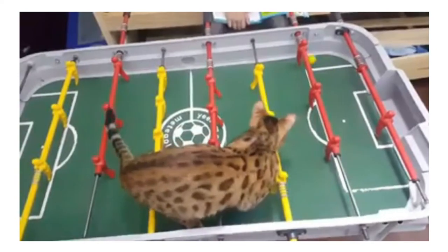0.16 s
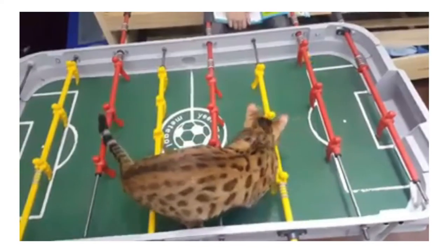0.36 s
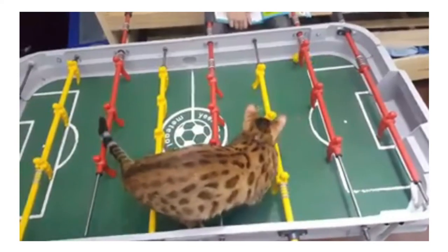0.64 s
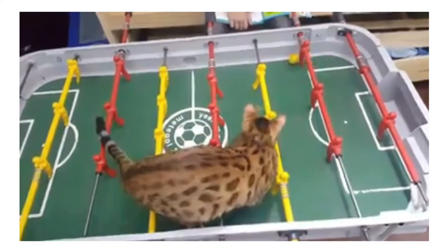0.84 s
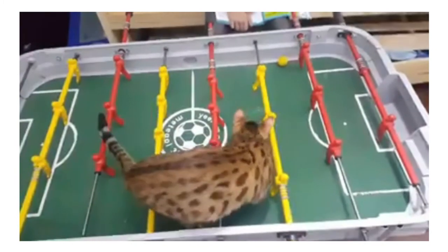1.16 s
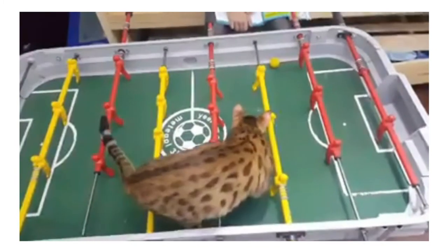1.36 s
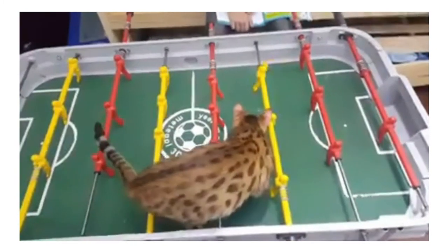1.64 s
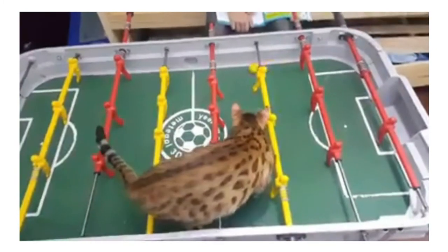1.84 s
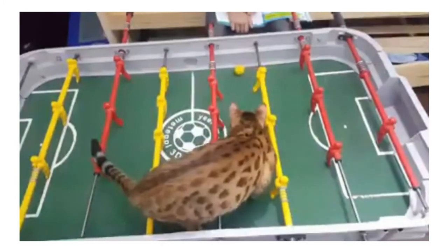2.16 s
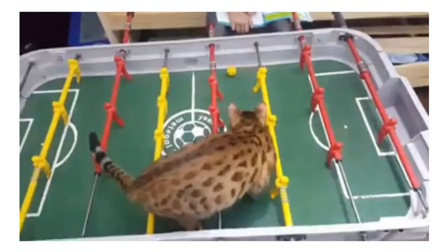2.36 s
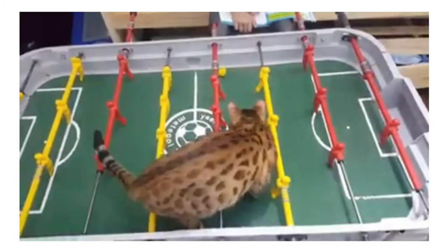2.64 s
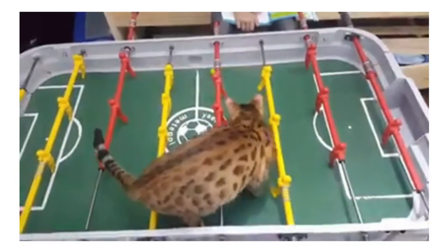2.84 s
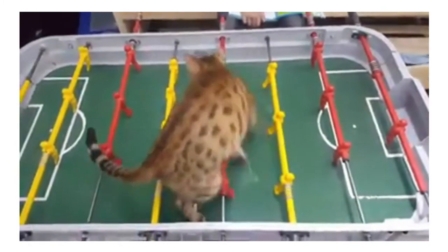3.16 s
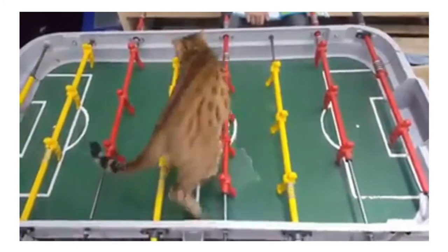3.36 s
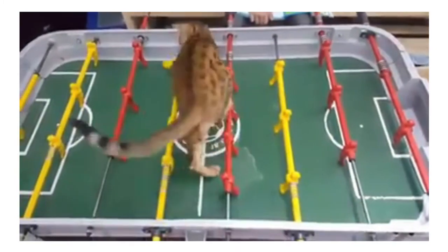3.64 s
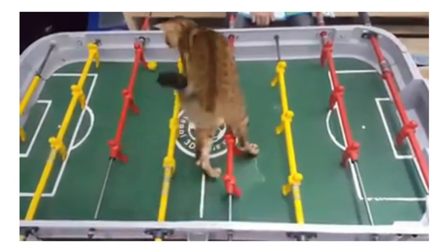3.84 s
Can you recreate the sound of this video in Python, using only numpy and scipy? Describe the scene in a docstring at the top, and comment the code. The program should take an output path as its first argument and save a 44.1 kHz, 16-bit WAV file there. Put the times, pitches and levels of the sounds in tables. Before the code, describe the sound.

Foosball table thumps, clacks and sliding rods in two bursts, with quiet ball rolling between

```python
"""Game table, close indoors

A stereo microphone pair close to a hollow game table: rods slide, rattle and scrape at both ends of the take,
with thumps, hard knocks and clacks; a small ball rolls between them. Pushes and noisy forces drive the
table's resonances, clacks are noise in the modes of the parts, and decaying noise makes the room's answer.
A faint coloured hiss lies behind, and all of it leans slightly to the left."""
import sys
import numpy as np
from scipy import signal
from scipy.fft import rfft, irfft, next_fast_len
from scipy.io import wavfile
from scipy.ndimage import uniform_filter1d, map_coordinates

SR = 44100
rng = np.random.default_rng(int(sys.argv[2]) if len(sys.argv) > 2 else 0)


def generate_wav(sig):
    """Save sig (samples, or channels by samples) to the path in sys.argv[1] as 16-bit PCM at SR."""
    pcm = np.round(np.clip(np.atleast_2d(sig).T, -1, 1) * 32767).astype(np.int16)
    wavfile.write(sys.argv[1], SR, pcm)


N = 176400  # samples: 4 s

# Resonances of the hollow table: (frequency [Hz], level before the scatter from spot to spot [dB])
TABLE_MODES = [(103, -57), (139, -42), (178, -46.5), (214, -42.5), (300, -41), (357, -45), (418, -45),
               (490, -49.5), (522, -49), (666, -44.5), (760, -45.5), (883, -52.5), (990, -51.5),
               (1163, -61)]
# Blows on the table: (time [s], level before the ring and push gains [dB], contact time scale [ms])
BLOWS = [(.322, -16, 0.4), (.378, -9, 0.56), (.351, -20.5, 0.44), (.3835, -20, .6), (.389, -16, 0.6),
         (.3935, -19, .6), (.414, -16.5, 0.58), (.462, -20.5, 0.37), (.5155, -20, .4), (.592, -34, 1),
         (.864, -46, .6), (3.068, -40, 0.5), (3.4175, -24, 1.1), (3.426, -10, 3.1), (3.4915, -13, .85),
         (3.904, -12, 1.1), (3.452, -26, 2.9), (3.5135, -21, .7), (3.5235, -17.5, .7), (3.5315, -18, .9),
         (3.5385, -19, .7), (3.5605, -18, 0.82), (3.5695, -21, .7), (3.5876, -24, .7), (3.7168, -28, .9),
         (3.769, -20, 1), (3.779, -21, 1), (3.7925, -22, 1), (3.812, -23, 1.2), (3.8745, -19, 1.8),
         (3.881, -16, 2.64), (3.9285, -17, .9), (3.942, -22, 0.59)]
# Clacks, short scrapes and the woody cores of knocks: (time [s], relative level [dB],
# bright top over body [dB], t60 [s], centre [Hz], reach around it [octaves], room's answer [dB])
CLACK_EVENTS = [(0.3216, -19, -53, 0.14, 1150, 0.79, 4.5), (0.379, -22.5, -40, 0.14, 1660, 0.51, -3),
                (.38, -13.5, -59, 0.21, 720, 0.17, -12), (.459, -17, -50, .15, 910, 0.32, -15),
                (.59, -36, -60, 0.37, 510, 0.32, -8), (0.4589, -23, -19.5, 0.11, 2230, 0.56, -4),
                (.5142, -21, -30, .02, 2300, .6, -16), (3.067, -25, -33, 0.28, 1510, 0.66, -6.5),
                (3.4237, -45, -37, 0.22, 2500, 0.82, -4), (3.468, -28.5, -18, 0.2, 2740, 0.44, -5.5),
                (3.473, -31, -15, 0.1, 2210, 0.26, -16), (3.488, -33.5, -10, 0.15, 3100, 0.17, 1),
                (3.503, -45, -9, 0.15, 3140, 0.23, 5), (3.528, -25, -38, 0.084, 2040, 0.71, 2),
                (3.547, -41, -33, 0.14, 1800, 0.85, -3), (3.565, -44.5, -36, 0.22, 3430, .3, 5.5),
                (3.599, -41, -36, 0.12, 1690, 0.37, -3), (3.881, -20, -9, 0.25, 2060, 0.59, -3),
                (3.904, -20.5, -34, 0.082, 2130, 0.53, -3), (3.963, -17.5, -20, 0.13, 2400, 0.34, -2.5),
                (3.985, -28, -25.5, 0.2, 2390, 0.81, -5)]
# Resonances of the parts, before detuning: (frequency [Hz], level [dB])
PARTS_MODES = [(790, 7.5), (940, 13.5), (1335, 5), (1560, 8.5), (2050, 2.5), (2200, 5), (2540, -5.5),
               (2840, -10.5), (3400, -21.5), (3725, 1.5), (4270, -36)]
# Bright top of a clack: (frequency [Hz], relative density [dB per Hz])
CLACK_TOP = [(2350, -18.5), (4000, 8), (4480, -13), (6520, 3), (11000, -11.5), (13000, -12.5),
             (15600, -26.5)]
# Two passages of sliding rods: (time [s], dull rumble [dB], bright rumble [dB], scrape [dB], treble [dB])
ROD_PASSAGES = [
    [(0, -29.5, -44.5, -61.5, -74), (.05, -46, -56, -87, -89), (.14, -39.5, -41, -87, -85),
     (.2, -38.5, -53, -69.5, -83), (.31, -42.5, -55.5, -71, -90), (.325, -52, -43.5, -51, -74),
     (.372, -57, -36.5, -59, -81), (.385, -37, -27, -62, -89), (.42, -40, -33.5, -63, -86),
     (.45, -78, -28.5, -48, -86.5), (.47, -32, -37, -49.5, -83), (.525, -55, -76, -69, -73),
     (.55, -60, -74, -77, -78), (.58, -65, -66, -75, -77), (.6, -59, -48.5, -77, -80),
     (.63, -42.5, -47, -72, -76), (.68, -61, -63, -70, -84), (.8, -63, -74, -90, -84)],
    [(3.414, -60, -38, -70, -66), (3.428, -26, -47, -48, -69), (3.46, -39, -31.5, -46, -58.5),
     (3.488, -46, -35, -46, -64), (3.496, -25.5, -20.5, -49, -60), (3.54, -34.5, -37.5, -46, -59.5),
     (3.6, -25.5, -33.5, -55, -65), (3.65, -34, -43.5, -50, -64), (3.7, -33.5, -45, -61, -71),
     (3.77, -29.5, -40, -56.5, -69), (3.83, -38, -38, -53, -70.5), (3.87, -29, -35, -59, -67.5),
     (3.899, -31, -38, -45, -67), (3.907, -36, -21, -50, -65), (3.945, -28, -33.5, -49, -58),
     (3.97, -50, -43, -49, -43.5), (4, -31, -42, -45, -52)],
]
# Scraping in the bushings: (frequency [Hz], relative density [dB per Hz])
SCRAPE_COLOUR = [(710, -5), (1200, 1), (1420, -11), (1670, 6.5), (1810, -5), (3530, -8.5), (4500, -26),
                 (5850, -54), (9900, -120)]
# Treble of the sliding rods: (frequency [Hz], relative density [dB per Hz])
ROD_TREBLE = [(2590, -30), (4400, -3.5), (4470, -7), (8840, -6.5), (11100, -20.5), (12100, -13.5),
              (15600, -40)]
# Rolling of the ball: (time [s], level [dB])
BALL_LEVEL = [(0.7, -66), (0.94, -57), (1.15, -55.5), (1.41, -63), (1.56, -57), (1.58, -66.5), (1.72, -48),
              (1.88, -53), (1.9, -58.5), (2.08, -54), (2.09, -66), (2.18, -53.5), (2.28, -59), (2.87, -62),
              (3.0, -52.5), (3.04, -103), (3.07, -39.5), (3.26, -60), (3.28, -49), (3.38, -51.5)]
# Decay of the room: (frequency [Hz], t60 [s])
ROOM_DECAY = [(150, 0.22), (700, 0.39), (3000, 0.41), (12000, 0.11)]
# Colour of the background hiss: (frequency [Hz], relative density [dB per Hz])
HISS_COLOUR = [(12, -35), (20, -13.5), (49, -9), (181, -2), (290, -9.5), (908, -22), (2550, -28.5),
               (4440, -36.5), (11100, -46.5), (12800, -42), (15600, -56)]
# Likeness of left and right, 1 = identical, for clacks and scraping: (frequency [Hz], correlation)
PARTS_LIKENESS = [(500, 1), (1200, 0.79), (4000, 0.38), (12000, .2)]
# The same for the room's answer: (frequency [Hz], correlation)
ROOM_LIKENESS = [(200, 0.95), (700, 0.7), (2000, 0.067), (10000, 0.039)]
# The same for the hiss: (frequency [Hz], correlation)
HISS_LIKENESS = [(60, 0.93), (240, 0.92), (950, 0.4), (3770, 0.086), (15000, 0.0)]
# Balance of the table, its parts and their room: (frequency [Hz], left over right [dB])
TABLE_BALANCE = [(60, 4), (180, 1.5), (550, 2.5), (1650, 3.5), (4970, 5.5), (15000, 4)]
# Balance of the hiss: (frequency [Hz], left over right [dB])
HISS_BALANCE = [(60, 1.6), (380, 2.3), (2380, 2.5), (15000, 0.5)]

MODE_WIDTH_HZ, MODE_WIDTH_SHARE = 4.7, 0.047  # table mode width: fixed part, and share of its pitch
BETWEEN_MODES_DB, RADIATION_HZ = -71.5, 124  # plain part between the modes; bass corner of the table
SPOT_SCATTER_DB, SPOTS_PER_S = 4, 9  # how far spots differ in mode level; pace of a wandering contact
RING_DB, PUSH_DB = -12.5, -5  # of a blow: the ringing table, and the push heard directly
PARTS_WIDTH_SHARE, DETUNE = 0.092, 0.03  # mode width over pitch; spread of log pitch from clack to clack
CLACK_ATTACK_S, STRIKE_DB, STRIKE_T60_S = 0.0018, 2, 0.0085  # rise; the louder first instant
CHATTER_DB, GRIT_DB = 2, 1.5  # unevenness (rms) of the clacks; of the rods' scraping
RATTLES_PER_S, RATTLE_SPREAD_DB = 500, 4
DULL_HZ, BRIGHT_HZ, ROLL_HZ = 526, 1370, 515  # contact corners: two rod rumbles and the ball
BLOW_ROOM_DB, HUM_ROOM_DB = -4.5, -4
HISS_DB = -56
THUD_HZ, BASS_HZ, TOP_HZ = 55, 81, 15720  # bass corner of blows; of everything else near; band limit


def knocks():
    """Each blow is one push and rebound, longer when softer; it is heard directly and rings the table."""
    out, t = np.zeros(N + SR), np.arange(SR // 2) / SR
    for time, db, contact_ms in BLOWS:
        u = t / (max(contact_ms, 0.1) / 1000) - 1.75  # time in contact lengths
        push = (1 - 4 * u ** 2 - u) * np.exp(-2 * u ** 2)
        ring = table(np.exp(-4.5 * u ** 2))
        ring = ring / np.abs(ring).max()
        start = round((time - contact_ms / 1300) * SR)
        out[start:][:len(t)] += amp(db) * (amp(RING_DB) * ring + amp(PUSH_DB) * push)
    return out[:N]


def clacks():
    """Clacks, scrapes and woody cores: a louder first instant, then uneven decaying noise in the parts' modes."""
    out, t = np.zeros((2, N + SR)), np.arange(SR // 2) / SR
    rise = np.sin(np.pi / 2 * np.minimum(t / CLACK_ATTACK_S, 1)) ** 2
    first_instant = 1 + amp(STRIKE_DB - 60 * t / STRIKE_T60_S)
    for time, db, top_db, t60, centre_hz, reach, room_db in CLACK_EVENTS:
        shift = np.exp(DETUNE * rng.standard_normal())
        modes = [(hz * shift, PARTS_WIDTH_SHARE * hz, level) for hz, level in PARTS_MODES]

        def colour(f):
            octaves = np.log2((f + 1) / centre_hz)
            return np.abs(ringing(f, modes, flat_db=-4)) * np.exp(-0.5 * (octaves / reach) ** 2)

        body = unit(filtered(rng.standard_normal((2, len(t))), colour))
        top = amp(top_db) * noise(CLACK_TOP, size=(2, len(t)))
        pair = spread(body + top, PARTS_LIKENESS)
        wander = uniform_filter1d(uniform_filter1d(rng.standard_normal(len(t)), size=90), size=90)
        chatter_db = CHATTER_DB * unit(wander) * np.minimum(t / 0.03, 1)  # sets in over 30 ms
        dry_clack = amp(db - 12 - 60 * t / max(t60, 0.005) + chatter_db) * rise * first_instant * pair
        answer = amp(room_db) * room(dry_clack)[:, :len(t)]
        out[:, round(time * SR):][:, :len(t)] += dry_clack + answer
    return out[:, :N]


def rods():
    """Sliding rods rattle the table, softly and hard, and scrape in their bushings."""
    dull = moving(soft(rattle(), DULL_HZ))
    bright = moving(np.gradient(soft(rattle(), BRIGHT_HZ)))
    grit = amp(GRIT_DB * unit(uniform_filter1d(rng.standard_normal(N), size=400)))
    scrape = unit(grit * spread(noise(SCRAPE_COLOUR, size=(2, N)), PARTS_LIKENESS))
    treble = unit(grit * spread(noise(ROD_TREBLE, size=(2, N)), PARTS_LIKENESS))
    out = np.zeros((2, N))
    for passage in ROD_PASSAGES:
        dull_gain, bright_gain, scrape_gain, treble_gain = curves(passage)
        out += dull_gain * dull + bright_gain * bright
        out += scrape_gain * scrape + treble_gain * treble
    return out


def rattle():
    """Irregular little impacts of uneven size over a weak steady noise force."""
    hit = rng.random(N) < RATTLES_PER_S / SR
    size = amp(RATTLE_SPREAD_DB * rng.exponential(size=N))
    return hit * size + 0.13 * rng.standard_normal(N)


def ball():
    """The rolling ball is a soft, noisy contact that keeps the table faintly humming."""
    return curves(BALL_LEVEL)[0] * moving(soft(rng.standard_normal(N), ROLL_HZ))


def moving(force):
    """A contact wandering between five spots of the table, each favouring other modes."""
    knots = rng.standard_normal((5, int(N * SPOTS_PER_S / SR) + 4))
    place = np.arange(N) * SPOTS_PER_S / SR
    share = np.exp(1.5 * np.array([map_coordinates(k, [place]) for k in knots]))
    share = share / share.sum(0)
    return unit(sum(unit(table(force)) * s for s in share))


def soft(x, cut_hz):
    """A soft contact passes little above its corner: four gentle low-passes."""
    twice = lambda f: 1 / (1 + 1j * f / cut_hz) ** 2
    return filtered(filtered(x, twice), twice)


def table(force):
    """The table's modes driven by a force at one spot; deep bass is not radiated."""
    modes = [(hz, MODE_WIDTH_HZ + MODE_WIDTH_SHARE * hz, db + SPOT_SCATTER_DB * rng.standard_normal())
             for hz, db in TABLE_MODES]
    radiated = lambda f: (1j * f / (RADIATION_HZ + 1j * f)) ** 2
    return filtered(force, lambda f: ringing(f, modes, BETWEEN_MODES_DB) * radiated(f))


def ringing(f, modes, flat_db):
    """Response of (Hz, width Hz, dB) resonances, alternating in sign, over a plain part."""
    total = amp(flat_db)
    for k, (hz, width, db) in enumerate(modes):
        total = total + (-1) ** k * amp(db) * 1j * f * width / (hz * hz - f * f + 1j * f * width)
    return total


def room(x):
    """The room's answer, about 7 ms late: a noise tail in which each frequency dies at its own speed."""
    hz, t, z = signal.stft(rng.standard_normal((2, SR // 2)), SR, nperseg=256)
    decay = amp(-60 * t / along(ROOM_DECAY, hz)[:, None])
    tail = spread(signal.istft(z * decay, SR, nperseg=256)[1], ROOM_LIKENESS)
    tail = tail / np.linalg.norm(tail[0])
    late = np.pad(x.mean(0), (300, 0))[None]
    return signal.fftconvolve(late, tail, axes=1)[:, :N]


def hiss():
    """Steady coloured noise, alike on both sides in the bass and unrelated in the treble."""
    return amp(HISS_DB) * spread(noise(HISS_COLOUR, size=(2, N)), HISS_LIKENESS)


def lean(x, points):
    """Left louder than right by frequency, half the difference on each side."""
    return filtered(x * np.ones((2, 1)), lambda hz: amp(along(points, hz) * np.array([[0.5], [-0.5]])))


def spread(pair, alike):
    """Two unrelated signals mixed to a left-right likeness."""
    turn = lambda hz: np.arccos(np.clip(along(alike, hz), -1, 1)) / 2
    mid, side = filtered(pair, lambda hz: np.array([np.cos(turn(hz)), np.sin(turn(hz))]))
    return np.array([mid + side, mid - side])


def noise(spectrum, size):
    """Coloured noise of rms 1."""
    return unit(filtered(rng.standard_normal(size), lambda hz: amp(along(spectrum, hz))))


def filtered(x, response):
    """x times a complex response of frequency, padded so its tail does not wrap around."""
    m = next_fast_len(x.shape[-1] + SR // 2)
    return irfft(rfft(x, m) * response(np.fft.rfftfreq(m, 1 / SR)), m)[..., :x.shape[-1]]


def curves(rows):
    """Smoothed gains per sample for each dB column, silent outside the rows."""
    times, *columns = np.transpose(rows)
    now = np.arange(N) / SR
    gains = [amp(np.interp(now, times, c, -150, -150)) for c in columns]
    return [uniform_filter1d(g, size=300, mode='nearest') for g in gains]


def along(points, hz):
    """(Hz, value) points read on a log frequency axis."""
    f, v = np.transpose(points)
    return np.interp(np.log(hz + 1), np.log(f + 1), v)


def amp(db):
    """Decibels to linear gain."""
    return 10 ** (np.asarray(db) / 20)


def unit(x):
    """Scaled to rms 1."""
    return x / np.sqrt(np.mean(x ** 2) + 1e-20)


def scene():
    """The table and its parts close by, the room around them and the hiss behind."""
    blows = filtered(knocks() * np.ones((2, 1)), lambda f: (1j * f / (THUD_HZ + 1j * f)) ** 2)
    sliding_and_rolling = rods() + ball()
    answer = room(amp(BLOW_ROOM_DB) * blows + amp(HUM_ROOM_DB) * sliding_and_rolling)
    near = sliding_and_rolling + clacks() + answer
    near = filtered(near, lambda f: (1j * f / (BASS_HZ + 1j * f)) ** 3)
    return lean(blows + near, TABLE_BALANCE) + lean(hiss(), HISS_BALANCE)


def record(dry):
    """Nothing is kept above the band limit."""
    return filtered(dry, lambda hz: hz < TOP_HZ)


dry = scene()
out = record(dry)
generate_wav(out)
```